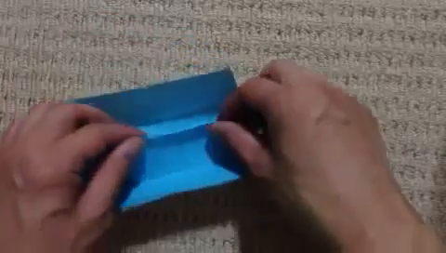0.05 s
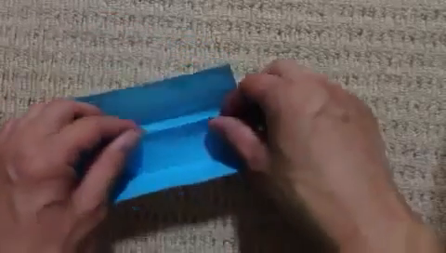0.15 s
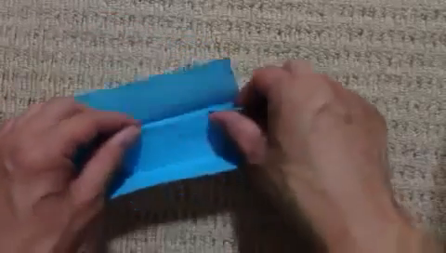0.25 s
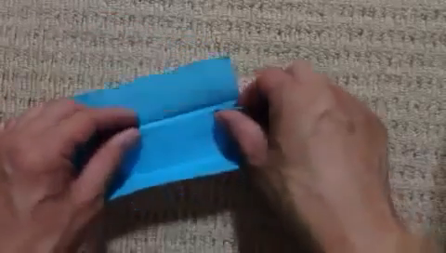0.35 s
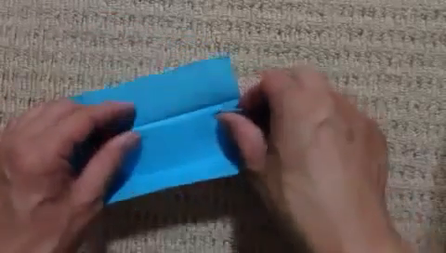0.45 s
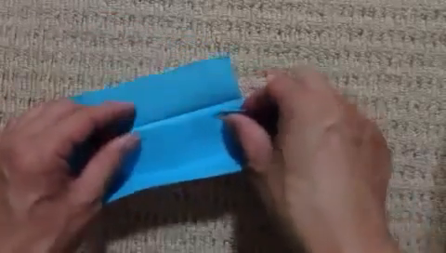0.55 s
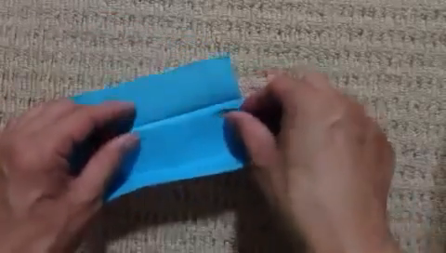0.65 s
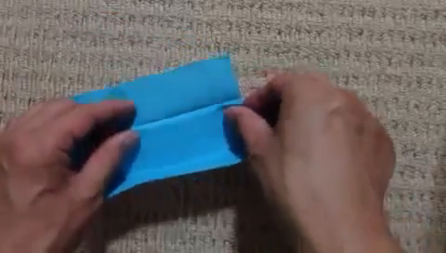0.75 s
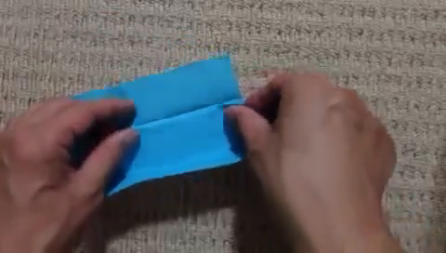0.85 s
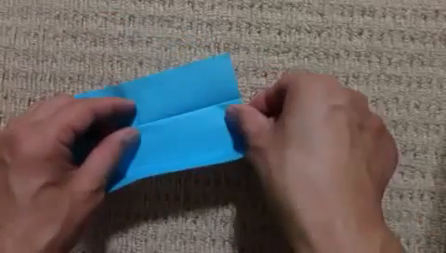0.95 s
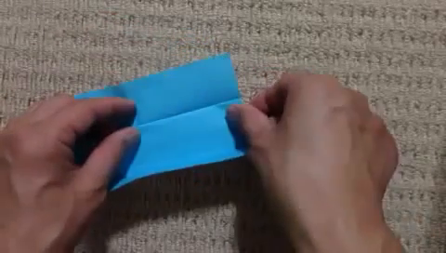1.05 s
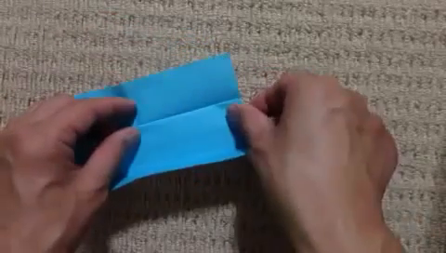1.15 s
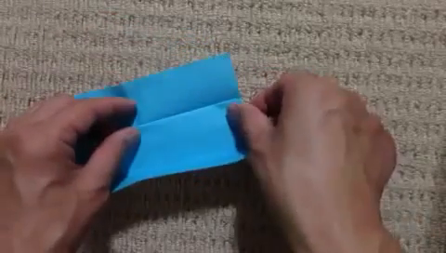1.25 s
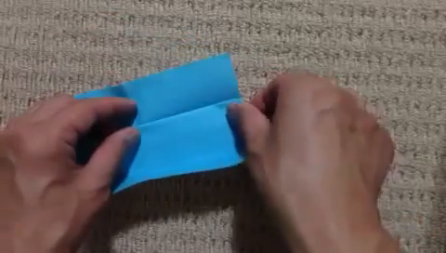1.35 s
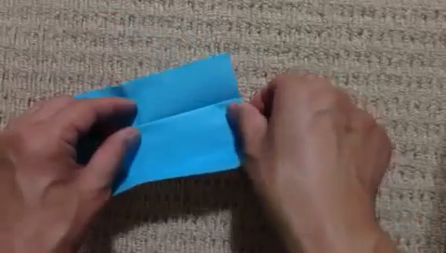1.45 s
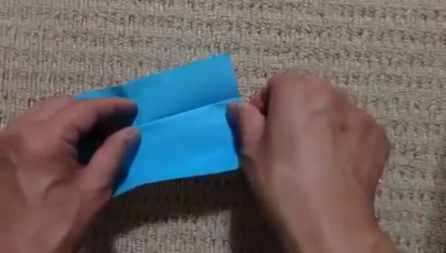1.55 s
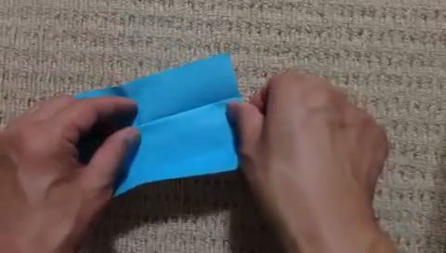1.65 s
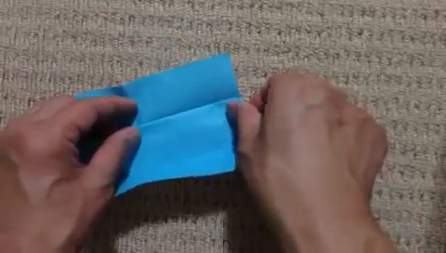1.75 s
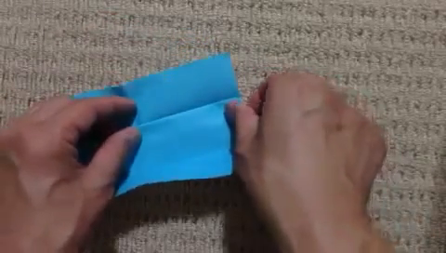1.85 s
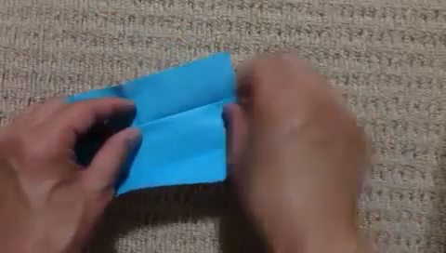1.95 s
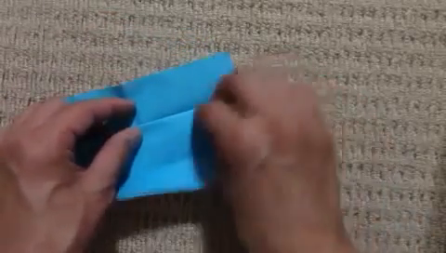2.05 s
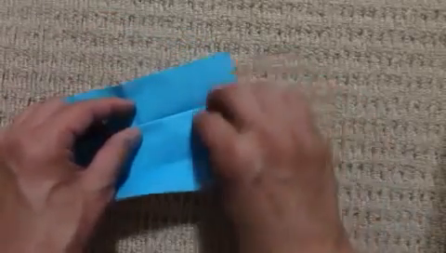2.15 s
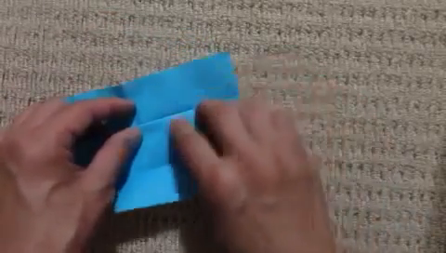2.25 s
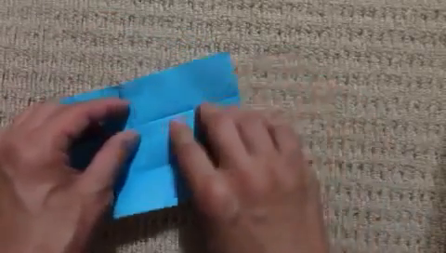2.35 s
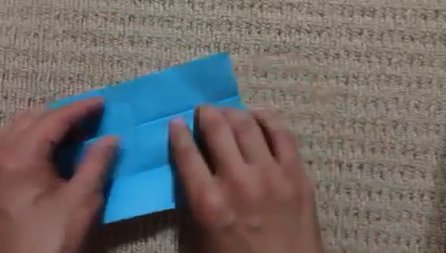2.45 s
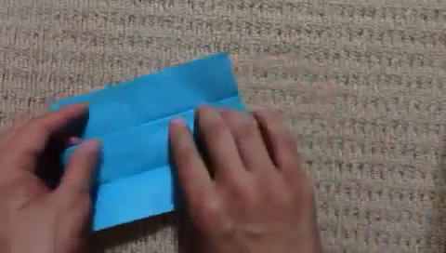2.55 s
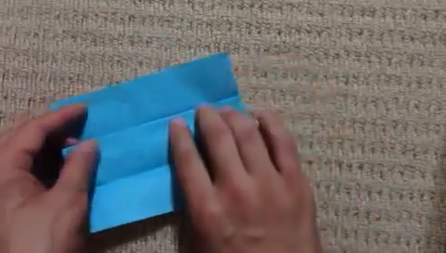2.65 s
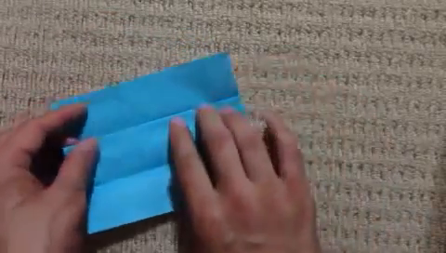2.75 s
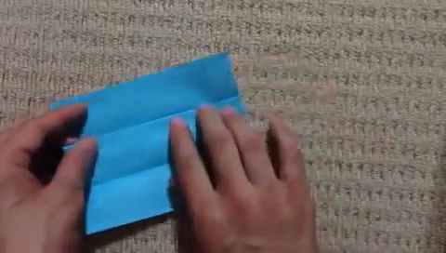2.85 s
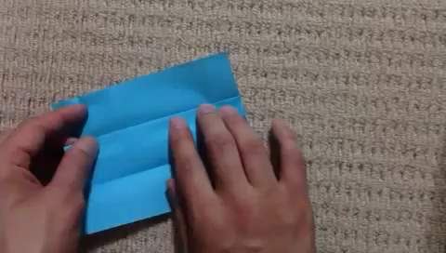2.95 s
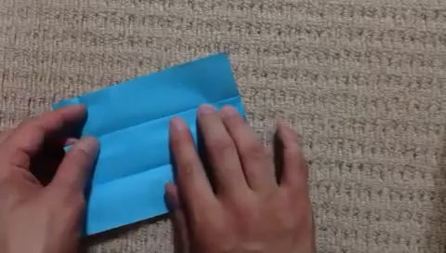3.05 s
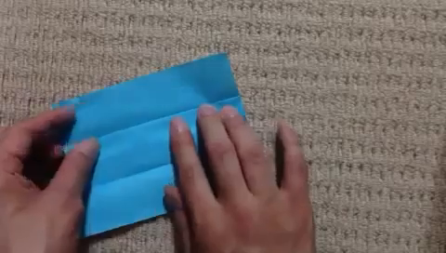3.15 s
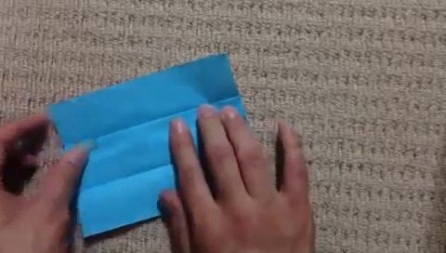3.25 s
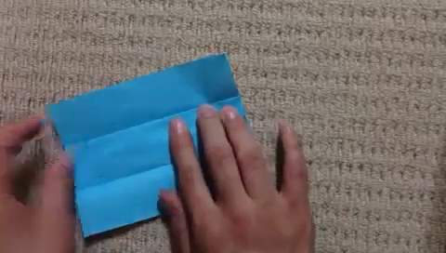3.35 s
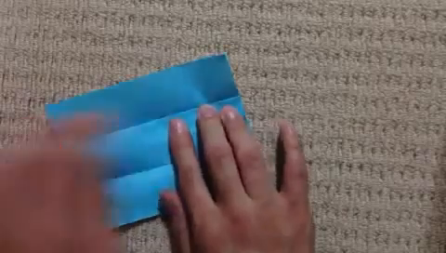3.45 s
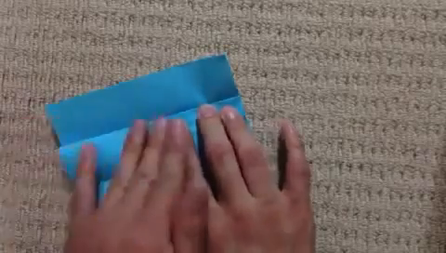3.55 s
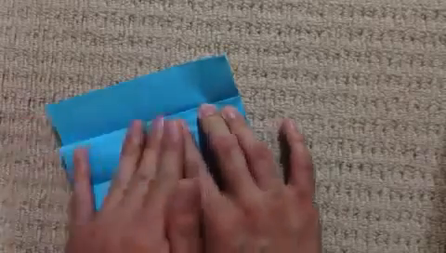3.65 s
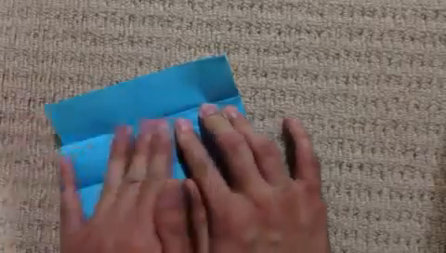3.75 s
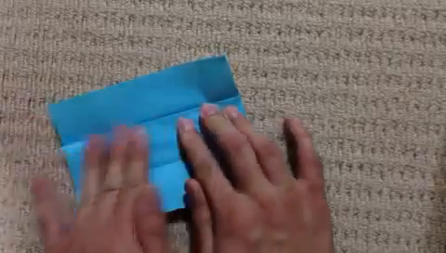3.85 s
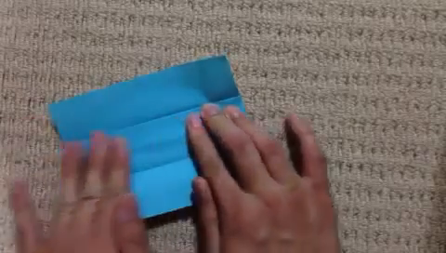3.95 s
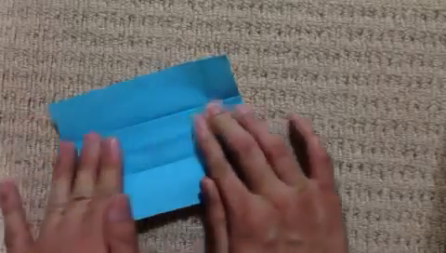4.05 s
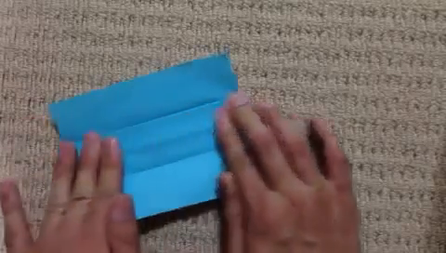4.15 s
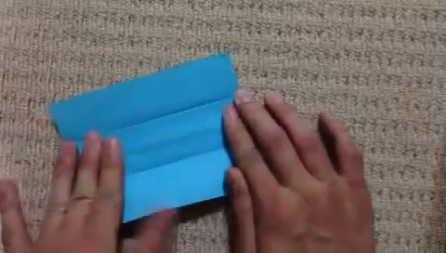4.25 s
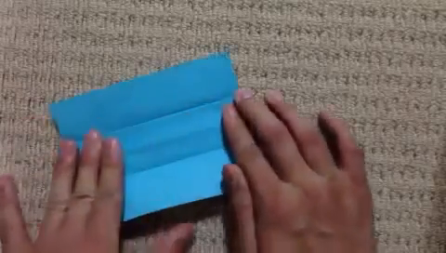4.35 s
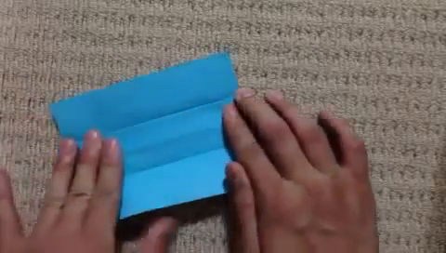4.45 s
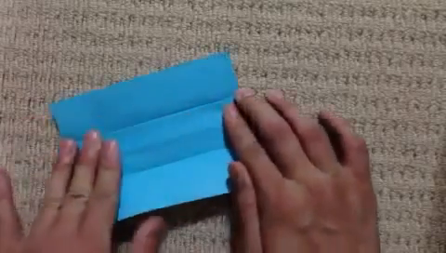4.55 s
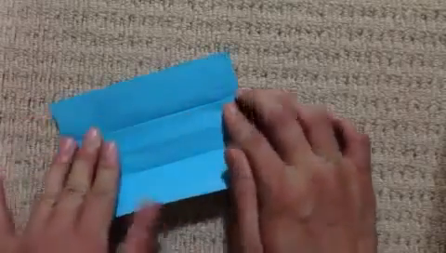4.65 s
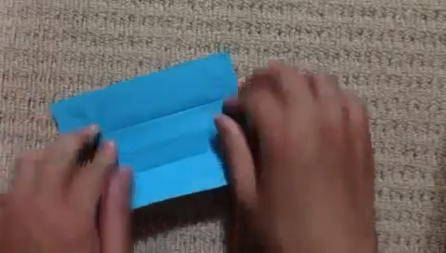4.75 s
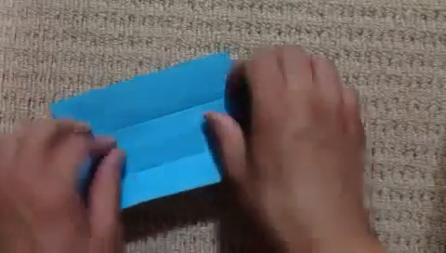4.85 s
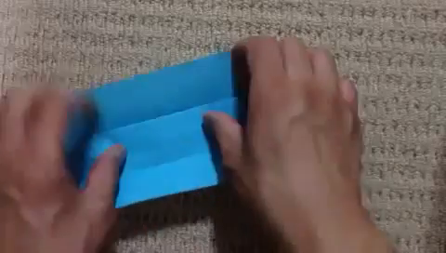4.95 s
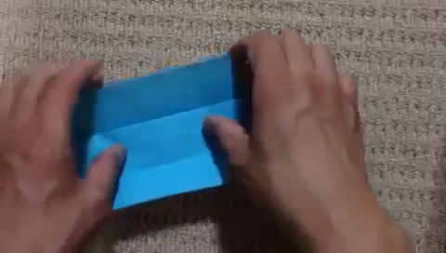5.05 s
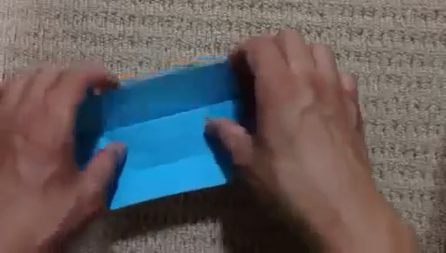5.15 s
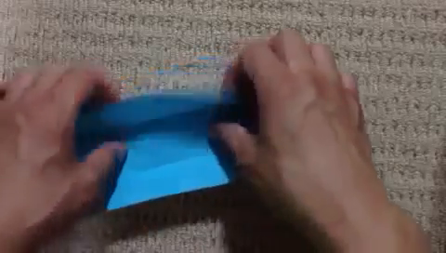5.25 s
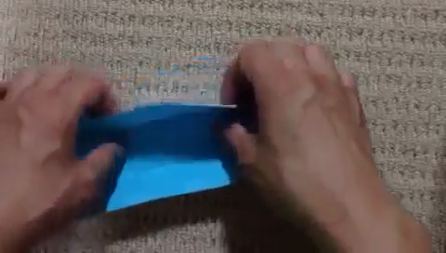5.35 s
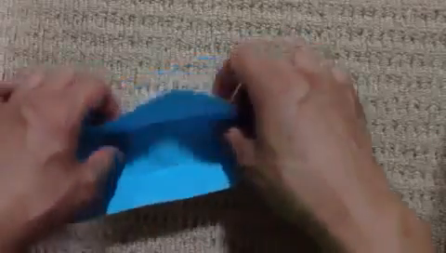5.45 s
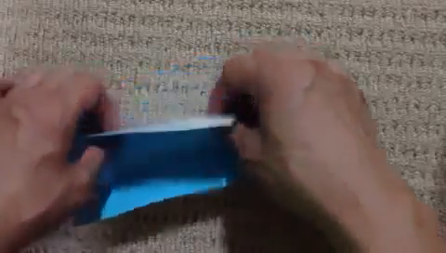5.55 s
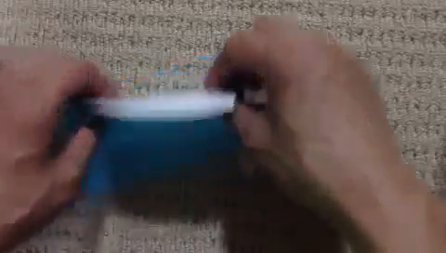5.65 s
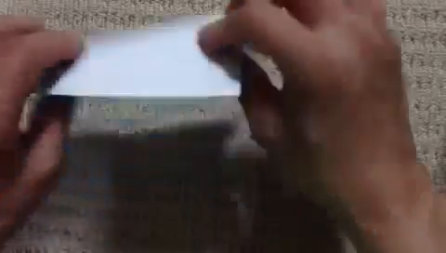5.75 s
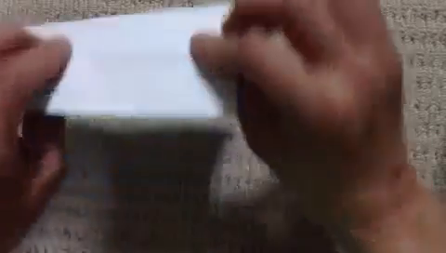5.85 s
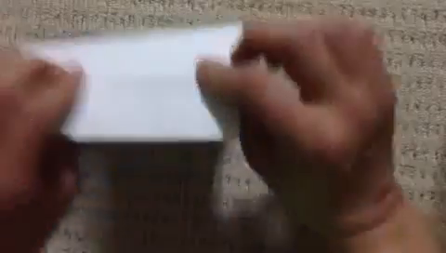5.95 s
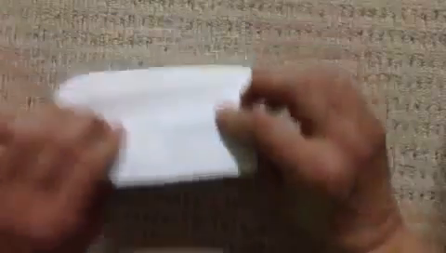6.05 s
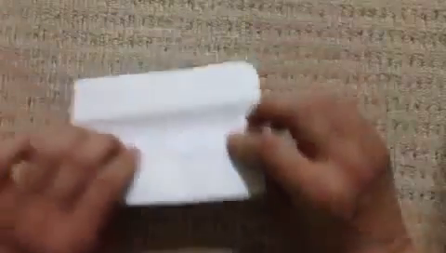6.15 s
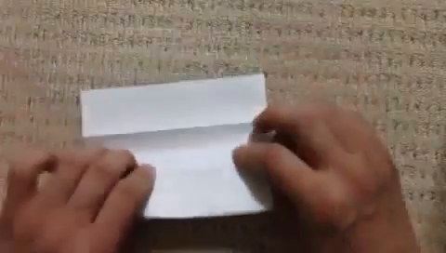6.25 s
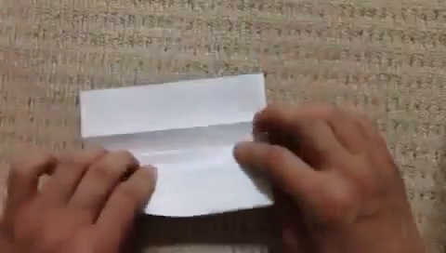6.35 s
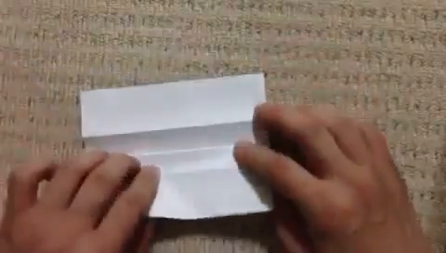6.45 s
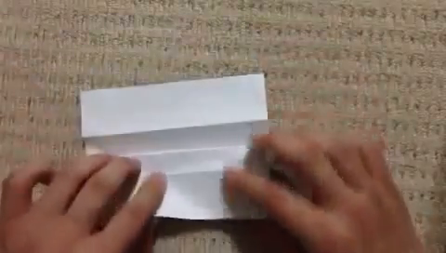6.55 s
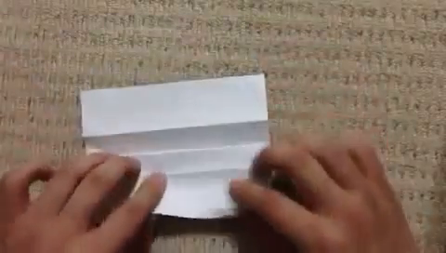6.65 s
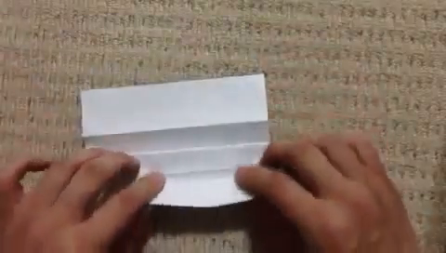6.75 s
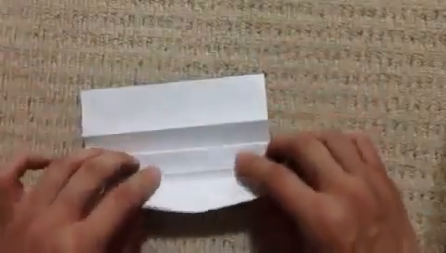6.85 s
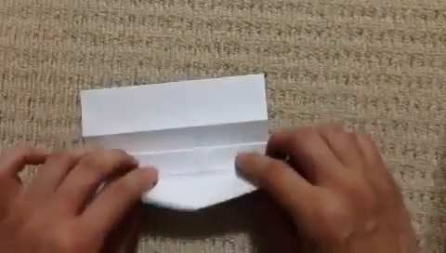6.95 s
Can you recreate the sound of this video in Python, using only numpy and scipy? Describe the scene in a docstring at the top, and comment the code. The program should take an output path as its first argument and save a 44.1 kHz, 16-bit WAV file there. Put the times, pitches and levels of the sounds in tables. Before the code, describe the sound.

Paper is folded and smoothed by hand on ribbed carpet, heard by a near microphone. Soft hissing strokes and sparse clicks grow into busy, sharp buckling with muffled thumps and hand rumble. The pressing fades to faint edge ticks, then the sheet is turned with bright snaps and pops, and handled again over low, steady room noise.

```python
"""Paper handled on carpet

A small sheet of paper is folded, pressed flat and turned over on a carpet, close up in a quiet room.
It buckles in sharp snaps (resonant noise bursts) and hollow pops (decaying sines that sag in pitch).
Sliding fingers and edges rustle as slip-clicks over smooth noise, strewn with tiny crinkles and one rasp.
Carpet ribs tick as an edge crosses them, hands rumble in dull filtered noise, and steady room noise lies below.
"""
import sys
import numpy as np
from scipy import signal
from scipy.fft import rfft, irfft, next_fast_len
from scipy.io import wavfile

SR = 44100
rng = np.random.default_rng(int(sys.argv[2]) if len(sys.argv) > 2 else 0)


def transcribe(signal):
    """Save signal, clipped to [-1, 1], as a 16-bit WAV file at the path in sys.argv[1]."""
    frames = np.atleast_2d(signal).T
    limited = np.clip(frames, -1, 1)
    pcm = np.round(limited * 32767).astype(np.int16)
    wavfile.write(sys.argv[1], SR, pcm)


N = 309141
TIME = np.arange(N) / SR  # s

# Event levels below are starting points; scene() trims some of the layers.
# Steady noise of the room, relative spectrum: freq_hz, density_db (per Hz)
ROOM_SPECTRUM = [(25, -36), (60, -21.5), (110, -12), (150, -1.5), (182, 3), (230, -6.5), (330, -5),
                 (450, -10), (1000, -13), (1700, -17.5), (7000, -18.5), (9000, -20.5), (15000, -21)]
ROOM_RMS_DB = -61.5

# Rumble of hands on carpet, relative spectrum: freq_hz, density_db (per Hz)
RUMBLE_SPECTRUM = [(30, -38), (60, -23), (100, -11.5), (130, -11.5), (160, 3.5), (190, 1), (225, -12),
                   (400, -11.5), (600, -18), (1000, -16.5), (2000, -41.5)]
# A hand shoves the sheet into the carpet: peak_s, rumble_db
CARPET_SHOVES = [(1.04, -60), (1.98, -62), (2.21, -62), (2.43, -64), (2.84, -63), (3.23, -53), (3.315, -52),
                 (3.36, -49), (3.61, -60), (3.71, -52.5), (3.871, -47.5), (4.0, -43), (4.12, -53.5),
                 (4.169, -43), (4.22, -50.5), (4.46, -51.5), (4.52, -52), (4.6, -52.5), (4.645, -49),
                 (4.731, -45)]
SHOVE_RISE_DB_PER_S, SHOVE_FALL_DB_PER_S = 400, 252

# The paper's edge crosses the carpet's ribs: start_s, end_s, ribs_per_s, tick_db, bump_db
RIB_DRAGS = [(0.531, 0.715, 54.4, -58, -70), (3.21, 3.39, 52.7, -52.5, -59), (4.42, 4.552, 72, -62, -59.5),
             (4.562, 4.611, 93, -53, -56), (4.675, 4.788, 85, -54.5, -57)]

# A finger drags along the paper's edge, one rasp: peak_s, length_s, level_db, centre_hz, width_hz
EDGE_RASP = (.062, .06, -48, 3880, 350)

# Resonances of the sheet and its surroundings: freq_hz, width_hz, boost_db
SHEET_RESONANCES = [(996, 250, 8.5), (1384, 50, 7), (1886, 200, 5.5), (2286, 170, 5.5), (3440, 1830, 10),
                    (4960, 1300, 1.5)]
# Hiss of the paper's surface, relative spectrum: freq_hz, density_db (per Hz)
HISS_SPECTRUM = [(1200, -36), (2300, -7), (3200, -8), (4000, -4), (5600, -1), (7000, -0.5), (8000, -8.5),
                 (9000, -15.5), (12000, -12.5), (15000, -22)]
# Flexing of the sheet under the hiss, relative spectrum: freq_hz, density_db (per Hz)
FLEX_SPECTRUM = [(200, -25), (400, -5), (600, 1), (1000, -3), (1600, 1.5), (2200, -14.5), (3000, -16.5),
                 (5000, -22)]
# A finger or edge slides over the paper: start_s, length_s, hiss_db, flex_db, swell_db_per_s
# (both levels hold at mid-stroke)
SLIDING_STROKES = [(0.0, 0.22, -51, -61.5, -16), (0.269, 0.43, -55.5, -61.5, -9),
                   (1.023, 0.022, -54, -57, -100), (1.955, 0.099, -57, -66, 28),
                   (2.21, 0.14, -58.5, -70, 2), (2.334, 0.12, -51.5, -59.5, -3),
                   (2.477, .15, -47, -57, -17), (2.68, 0.037, -50.5, -60, 4), (2.755, 0.11, -62, -65, -22),
                   (3.226, 0.13, -48, -57, 30), (3.398, .11, -53, -56.5, 65), (3.548, .11, -78, -63.5, -30),
                   (3.705, 0.017, -53.5, -57, -100), (3.803, 0.021, -56, -46.5, -60),
                   (3.876, .06, -53, -63, 0), (3.956, 0.22, -49, -54.5, -39), (4.213, .11, -49, -53.5, -65),
                   (4.422, 0.44, -62.5, -71, 9), (4.892, 0.15, -59, -65, 36),
                   (5.016, .11, -53.5, -64.5, -60), (5.162, 0.31, -62.5, -63, 2),
                   (5.488, 0.072, -49.5, -54, 33), (5.626, 0.13, -51, -55, -31),
                   (5.826, 0.048, -63, -59, -30), (6.112, 0.026, -77, -57.5, 0),
                   (6.18, 0.043, -62, -52.5, 0), (6.276, 0.066, -58, -58.5, 30),
                   (6.393, 0.026, -46, -47, 0), (6.455, 0.17, -50, -57.5, 4), (6.66, 0.097, -59, -66, 3),
                   (6.784, 0.082, -50.5, -59, -50), (6.884, 0.16, -55, -68, 44)]
STROKE_ATTACK_S, STROKE_RELEASE_S = 0.024, 0.042  # to full speed, back to rest
RESTING_HISS_DB, RESTING_FLEX_DB = -72.5, -76  # fingers that only hold the sheet still creep a little

# A whole panel flips over with a hollow pop: start_s, peak_db (before the bass cut), pitch_hz, t60_s
PANEL_POPS = [(0.4204, -25.5, 1370, 0.01), (2.565, -31.5, 1404, 0.04), (2.565, -34, 944, 0.033),
              (5.229, -42, 1160, 0.016), (5.264, -39.5, 1100, 0.027), (5.278, -36, 1090, 0.012),
              (5.287, -31, 1070, 0.013), (6.176, -33, 850, 0.013), (6.184, -28.5, 1900, 0.035),
              (6.211, -35, 1290, 0.037), (6.22, -34, 1370, 0.013), (6.384, -40, 2040, 0.053),
              (6.749, -42, 865, 0.023), (6.7757, -18.5, 876, 0.012)]

# The sheet buckles, and from 4.634 to 4.7777 s the edge ticks over carpet ribs: start_s, crack_db (held for 1
# ms), body_db (re crack), sizzle_db (re crack), t60_s
SHEET_SNAPS = [(0.365, -43.5, 3, -19, 0.027), (0.4204, -26, -9, -20, 0.0024), (0.567, -41.5, -8, -24, .004),
               (0.7011, -55, 6, -13, .014), (0.978, -46, -9, -18, 0.0026), (1.0167, -31, -9.5, -24, 0.0054),
               (1.1642, -35.5, -10.5, -13, 0.0018), (1.228, -35, -1.5, -12, 0.027),
               (1.369, -43, -7, -8, 0.0038), (1.3883, -45, -3, -6, .002), (1.4305, -36, -4.5, -15, 0.0057),
               (1.8511, -36.5, -0.5, -32, 0.0032), (2.0393, -34, -10, -15, 0.021),
               (2.0611, -46.5, 9, -22, 0.0063), (2.1738, -27, -7.5, -14, 0.0019),
               (2.1942, -22.5, -21, -12, 0.021), (2.1975, -20.5, -16.5, -21, 0.014),
               (2.2056, -30, -3, -28, 0.06), (2.3295, -35.5, 1, -30, 0.0033),
               (2.3838, -28, -11.5, -34, 0.028), (2.428, -22.5, -16, -29, 0.014),
               (2.433, -23, -5, -6.5, 0.012), (2.485, -28.5, -7, -25, 0.007),
               (2.5482, -33, -7, -25, 0.0088), (2.5653, -24, -30, -23, 0.0018),
               (2.6952, -22.5, -8.5, -22, 0.0016), (2.7839, -39.5, 2.5, -28, 0.024),
               (2.835, -44.5, -4, -22, 0.0087), (2.9416, -39.5, -7.5, -11, 0.033),
               (3.2421, -26.5, -18, -30, 0.0031), (3.259, -31.5, -5.5, -12, 0.0035),
               (3.273, -26.5, -12, -27, 0.0035), (3.3155, -31.5, -2, -29, .03),
               (3.3414, -29, -8, -34, 0.0024), (3.3581, -32, -4.5, -32, 0.0029),
               (3.3794, -30.5, -12, -34, .007), (3.4949, -34, -6.5, -17, 0.024),
               (3.506, -39, -4, -25, .007), (3.5186, -18, -22.5, -26, 0.0031),
               (3.7054, -19, -17.5, -22, 0.013), (3.714, -41, 2.5, -25, .033),
               (3.7965, -26.5, -15, -11.5, 0.0042), (3.8083, -30.5, -4, -26, 0.017),
               (3.835, -39, -10, -21, .005), (3.861, -36.5, -11, -13, 0.0039),
               (3.868, -38, 0.5, -10, 0.028), (3.9532, -21.5, -6, -24, .036),
               (3.9674, -26.5, -6, -26, 0.021), (4.007, -27, -3.5, -21, 0.014),
               (4.061, -33, -6, -15, 0.018), (4.0858, -34.5, 1, -28, 0.0091),
               (4.1235, -38.5, 1.5, -11, 0.026), (4.2107, -24.5, -1, -20, 0.0046),
               (4.2276, -17.5, -12.5, -23, 0.0038), (4.247, -33.5, -6, -27, 0.016),
               (4.5123, -47, 1.5, -15, 0.01), (4.634, -38.5, -11, -14, .02),
               (4.6597, -39.5, -8, -20, 0.0037), (4.715, -36.5, -22, -23, .004),
               (4.737, -37.5, -11, -25, 0.005), (4.7632, -41, -8, -13, .006),
               (4.7777, -45.5, -3, -17, .012), (4.834, -44, -7, -12, 0.031),
               (5.117, -38.5, -42, -17, 0.017), (5.23, -56, 4, -16, .007), (5.2779, -47.5, 4, -3, 0.015),
               (5.2868, -53, 12, -14, 0.007), (5.355, -36.5, 2.5, -32, 0.014), (5.382, -46, 3, -20, 0.028),
               (5.633, -13, -22, -19, 0.0042), (5.6571, -17.5, -8, -13, 0.0043),
               (5.684, -21, -4.5, -10, 0.01), (5.7444, -17, -16.5, -31, 0.003),
               (5.82, -35.5, 4.5, -24, 0.011), (6.182, -27.5, 0, -21, 0.013), (6.214, -52, 20, -16, 0.048),
               (6.2916, -47.5, 9, -25, 0.035), (6.328, -34, -4, -16, .039), (6.389, -43, 13, -23, 0.067),
               (6.3957, -21.5, -5, -23, .0057), (6.49, -34.5, -13, -11, 0.0052),
               (6.5311, -32, -13, -14, 0.003), (6.5561, -35, 1.5, -12, 0.0058),
               (6.6344, -30.5, -5, -29, .033), (6.7743, -16, -11.5, -9.5, 0.018),
               (6.8122, -36.5, -8, -13, .0025)]
# While the sheet lies flat the carpet takes part in each snap and gives it a stronger thump
FLAT_FROM_S, FLAT_UNTIL_S = 2.1, 4.9
THUMP_FLAT_DB, THUMP_LIFTED_DB = -7.5, -13  # re the table's body_db

CUTOFF_HZ = 15150


def from_db(db):
    """Decibels to gain."""
    return 10 ** (np.asarray(db) / 20)


def rms_one(x):
    """Scale to unit rms."""
    return x / np.sqrt(np.mean(x ** 2) + 1e-20)


def band(x, low_hz, high_hz, order=2):
    """Causal band-pass."""
    edges = [low_hz, min(high_hz, .45 * SR)]
    return signal.sosfilt(signal.butter(order, edges, "band", fs=SR, output="sos"), x)


def coloured(x, spectrum):
    """Filter a texture to a spectrum drawn over log frequency; rms 1."""
    hz, db = np.transpose(spectrum)
    size = next_fast_len(N)
    bins_hz = np.maximum(np.arange(size // 2 + 1) * SR / size, 1)
    gain = from_db(np.interp(np.log(bins_hz), np.log(hz), db))
    return rms_one(irfft(rfft(x, size) * gain, size)[:N])


def drift(rate):
    """Slow random wander of rms 1, with `rate` new values per second."""
    knots = rng.standard_normal(4000)
    return rms_one(np.interp(TIME * rate, np.arange(len(knots)), knots))


def decaying(impulses, decay_s):
    """Give each impulse an exponential tail that falls to 1/e in decay_s."""
    # the tiny offset avoids a silent filter input
    return signal.lfilter([1], [1, -np.exp(-1 / (decay_s * SR))], impulses + 1e-18)


def room_noise():
    """The still room is steady noise with its own spectrum."""
    return from_db(ROOM_RMS_DB) * coloured(rng.standard_normal(N), ROOM_SPECTRUM)


def room_tail(x, wet_db, t60, gap_s):
    """A short, soft tail of dense reflections, made of decaying noise after a gap."""
    t = np.arange(SR // 2) / SR
    tail = band(rng.standard_normal(len(t)), 100, 4800)
    tail *= from_db(-60 * t / t60) * (t > gap_s)
    return from_db(wet_db) * signal.fftconvolve(x, tail / np.linalg.norm(tail))[:N]


def friction(per_s, spread_db, smooth, flutter_db):
    """Fibres catch and slip: tiny clicks of uneven size over a smooth rub, in uneven spurts."""
    sizes = from_db(spread_db * np.minimum(rng.exponential(1, N), 4))
    sizes = sizes * rng.choice([-1, 1], N)
    slips = rms_one(sizes * (rng.random(N) < per_s / SR))
    rub = smooth * rng.standard_normal(N)
    return (slips + rub) * from_db(flutter_db * drift(70))


def carpet(level_db):
    """Hands drag the sheet over carpet loops: a dull, lumpy rumble builds and dies with each shove."""
    press_db = np.full(N, -120.0)
    for peak_s, db in CARPET_SHOVES:
        drop_db = np.maximum(SHOVE_RISE_DB_PER_S * (peak_s - TIME), SHOVE_FALL_DB_PER_S * (TIME - peak_s))
        press_db = np.maximum(press_db, db - drop_db)
    rub = friction(per_s=250, spread_db=4.0, smooth=0.62, flutter_db=1.5)
    return from_db(level_db + press_db) * coloured(rub, RUMBLE_SPECTRUM)


def sheet(x):
    """Resonances in series colour the paper's sound, each adding a ringing band to what it receives."""
    for hz, width, boost_db in SHEET_RESONANCES:
        r = np.exp(-np.pi * width / from_db(boost_db / 2) / SR)
        zeros = np.array([1, 0, -1]) * (1 - r * r) / 2
        poles = [1, -2 * r * np.cos(2 * np.pi * hz / SR), r * r]
        ring = signal.lfilter(zeros, poles, x)
        x = x + (from_db(boost_db) - 1) * ring
    return x


def ribs(jitter, spread_db, tick_s):
    """Each rib catches the edge and lets it go: a light tick above, a dull bump below."""
    out = np.zeros(N)
    for start, end, per_s, tick_db, bump_db in RIB_DRAGS:
        chance = rng.standard_normal((40, 2))  # uneven spacing, uneven strength
        times = start + np.cumsum(np.exp(jitter * chance[:, 0])) / per_s
        inside = times < end
        catches = np.zeros(N)
        catches[(times[inside] * SR).astype(int)] = from_db(spread_db * chance[inside, 1])
        scratch = decaying(catches, tick_s) * rng.standard_normal(N)
        ticks = rms_one(sheet(band(scratch, 870, 7400, order=3)))
        knock = catches + 1e-18
        bumps = rms_one(band(knock, 131, 229) + band(knock, 284, 287, order=1) / 2)
        # levels are rms over the drag itself, not the whole scene
        duty = np.sqrt((end - start) * SR / N)
        out += (from_db(tick_db) * ticks + from_db(bump_db) * bumps) * duty
    return out


def rasp():
    """The edge chatters as narrow-band noise that swells and fades while the finger passes."""
    peak_s, length, db, hz, width = EDGE_RASP
    swell = np.exp(-(2 * (TIME - peak_s) / length) ** 2)
    return from_db(db) * swell * rms_one(band(rng.standard_normal(N), hz - width / 2, hz + width / 2))


def sliding(uneven_db, uneven_per_s):
    """Hiss and flex gains: each stroke starts, swells or fades under unsteady pressure, then rests."""
    power = np.zeros((2, N))
    for start, length, hiss_db, flex_db, swell_db_per_s in SLIDING_STROKES:
        end = start + length
        corners = [start - STROKE_ATTACK_S, start, end, end + STROKE_RELEASE_S]
        on = (TIME > corners[0]) & (TIME < corners[-1])
        swell_db = swell_db_per_s * (TIME[on] - start - length / 2)
        speed = np.interp(TIME[on], corners, [0, 1, 1, 0]) * from_db(swell_db)
        power[:, on] += (from_db([[hiss_db], [flex_db]]) * speed) ** 2
    pressure = from_db(uneven_db * drift(uneven_per_s))
    resting = from_db([[RESTING_HISS_DB], [RESTING_FLEX_DB]])
    return np.hypot(np.sqrt(power) * pressure, resting)


def rustle(hiss, flex, hiss_db, flex_db):
    """Skin and paper edges slide: the surface hisses and the sheet flexes below it."""
    rub = sheet(friction(per_s=1400, spread_db=3.0, smooth=.9, flutter_db=1))
    surface = from_db(hiss_db) * hiss * coloured(rub, HISS_SPECTRUM)
    bending = from_db(flex_db) * flex * coloured(rub, FLEX_SPECTRUM)
    return surface + bending


def crinkles(hiss, flex, per_s, spread_db, level_db):
    """Tiny buckles scatter through the rustle, their level following the sliding that sets them off."""
    sizes = from_db(spread_db * np.minimum(rng.exponential(1, N), 2.5))
    buckles = sizes * (rng.random(N) < per_s / SR)
    ticks = sheet(decaying(buckles, 0.0015) * rng.standard_normal(N))
    surface = hiss * coloured(ticks, HISS_SPECTRUM)
    bending = flex * rms_one(band(ticks, 590, 3600))
    return from_db(level_db) * (surface + bending)


def pops(level_db, sag):
    """A panel rings briefly, its pitch sagging as it relaxes; so small a sheet radiates no bass."""
    out = np.zeros(N + SR)
    t = np.arange(SR // 10) / SR
    for start, db, hz, t60 in PANEL_POPS:
        pitch_hz = hz * (1 + sag * np.exp(-10 * t / t60))  # settles on the table's pitch
        phase = 2 * np.pi * np.cumsum(pitch_hz) / SR
        at = int(start * SR)
        out[at:at + len(t)] += from_db(level_db + db - 60 * t / t60) * np.sin(phase)
    return band(out[:N], 820, 5000, order=3)


def snap(levels_db, t60, kick, flutter_db, flutter_t60, size=3000):
    """A buckle flips, then bending waves cross the sheet and die: noise with two decays and a kick."""
    t = np.arange(size) / SR
    t60 = max(t60, .002)
    decay = from_db(-60 * t / t60) + from_db(flutter_db - 60 * t / flutter_t60)
    waves = rng.standard_normal(size) * decay
    waves *= 1 - np.exp(-t / (0.053 * t60))  # slow buckles also start more softly
    waves /= np.linalg.norm(waves)
    waves[4] += kick * min(1, 0.0027 / t60)  # one sharp pulse, strongest in the quickest buckles
    waves = sheet(waves)
    crack = band(waves, 3820, 18600, order=3)
    crack = signal.sosfilt(signal.butter(10, 7300, fs=SR, output="sos"), crack)
    thump = band(waves, 230, 900)
    body = -band(waves, 1300, 2364)
    sizzle = band(waves, 8500, 16500)
    out = np.zeros(size)
    for db, part in zip(levels_db, [crack, thump, body, sizzle]):
        out += from_db(db) * part / np.linalg.norm(part)
    return out * np.sqrt(SR / 1000)  # a level means this energy held for 1 ms


def snaps(crack_db, body_db, sizzle_db):
    """Each buckle balances crack, body and sizzle; its thump depends on how the sheet lies."""
    out = np.zeros(N + SR)
    for start, db, body, sizzle, t60 in SHEET_SNAPS:
        thump_db = THUMP_FLAT_DB if FLAT_FROM_S < start < FLAT_UNTIL_S else THUMP_LIFTED_DB
        levels_db = db + np.array([crack_db, body + thump_db, body + body_db, sizzle + sizzle_db])
        one = snap(levels_db, t60, kick=0.97, flutter_db=-5.0, flutter_t60=0.022)
        at = int(start * SR)
        out[at:at + len(one)] += one
    return out[:N]


def scene():
    """Mix the still room, the carpet and the paper; only snaps and pops feed the room tail."""
    air = room_noise()
    hiss, flex = sliding(uneven_db=1.0, uneven_per_s=45)
    handling = carpet(level_db=2.0) + ribs(jitter=0.18, spread_db=1.5, tick_s=0.00067) + rasp()
    handling += rustle(hiss, flex, hiss_db=-0.5, flex_db=-5.5)
    handling += crinkles(hiss, flex, per_s=120, spread_db=2.5, level_db=-8)
    cracks = pops(level_db=-2.0, sag=0.041) + snaps(crack_db=0.0, body_db=-2.0, sizzle_db=-2.5)
    tail = room_tail(cracks, wet_db=-20.0, t60=0.14, gap_s=0.0043)
    return (air + handling + cracks + tail)[None]


def record(dry):
    """A steep elliptic low-pass cuts off the top."""
    return signal.sosfilt(signal.ellip(10, .3, 80, CUTOFF_HZ, fs=SR, output="sos"), dry)


dry = scene()
out = record(dry)
transcribe(out)
```